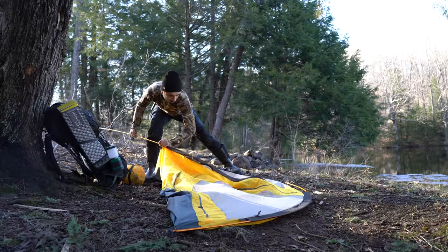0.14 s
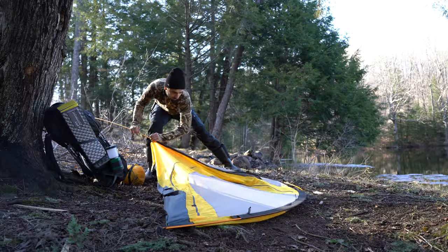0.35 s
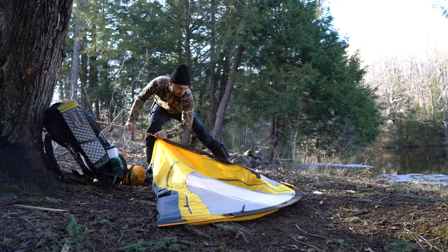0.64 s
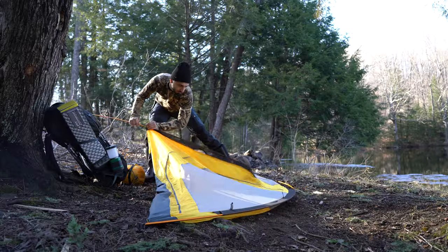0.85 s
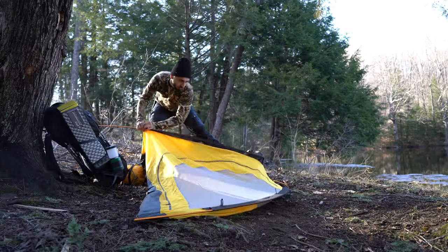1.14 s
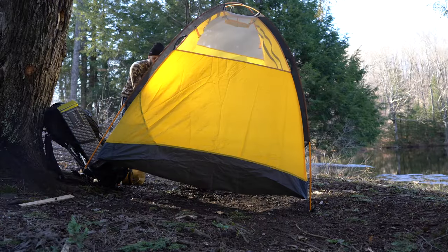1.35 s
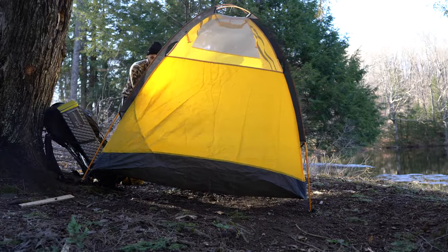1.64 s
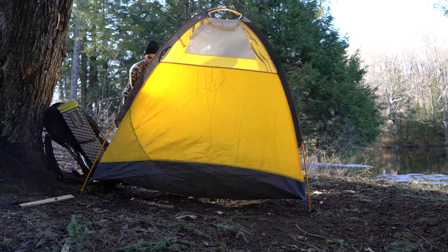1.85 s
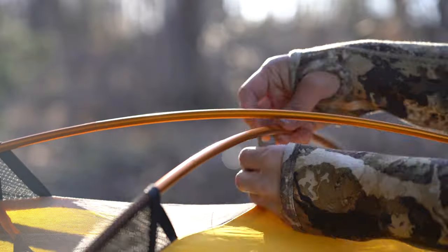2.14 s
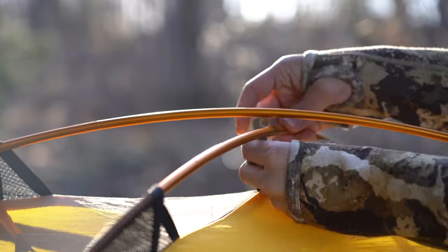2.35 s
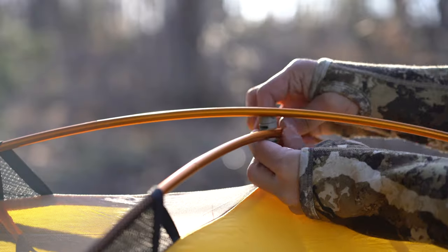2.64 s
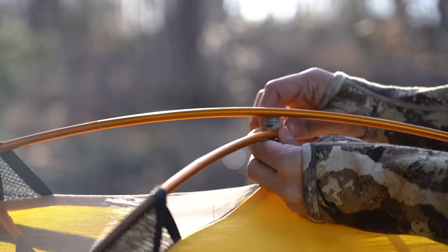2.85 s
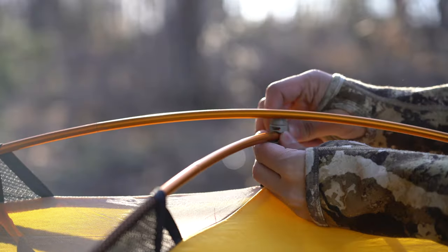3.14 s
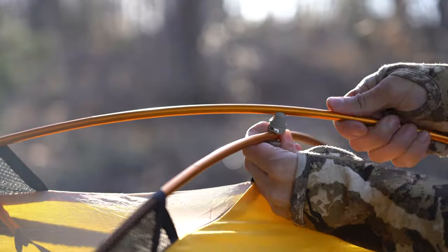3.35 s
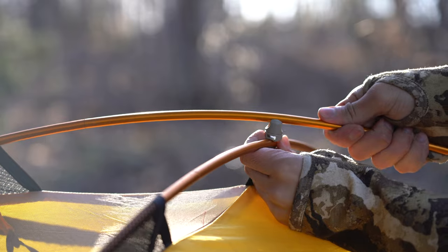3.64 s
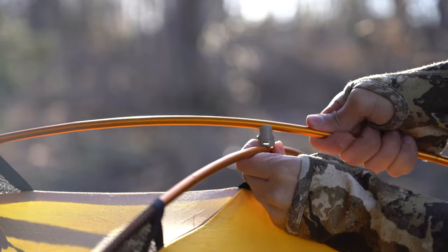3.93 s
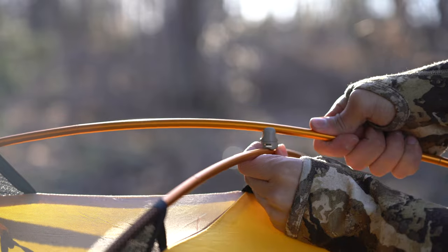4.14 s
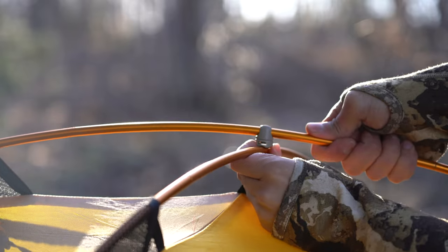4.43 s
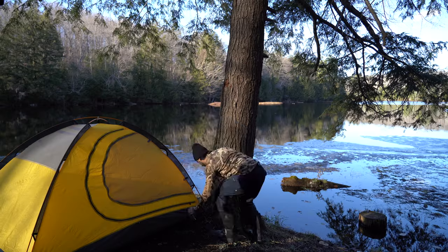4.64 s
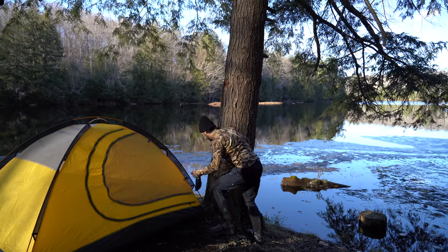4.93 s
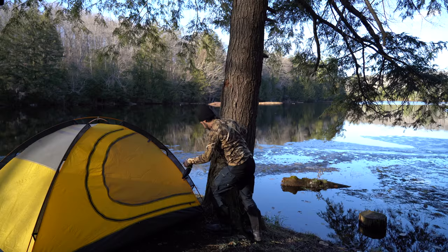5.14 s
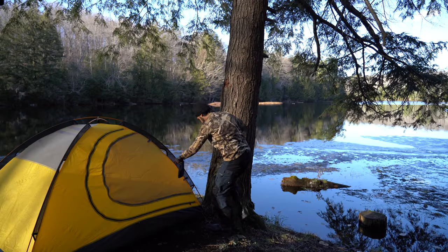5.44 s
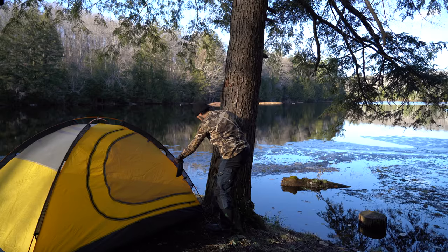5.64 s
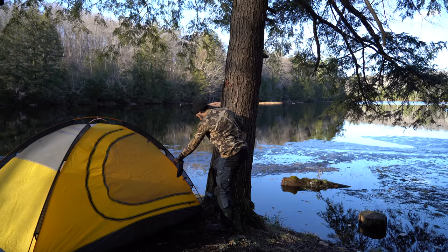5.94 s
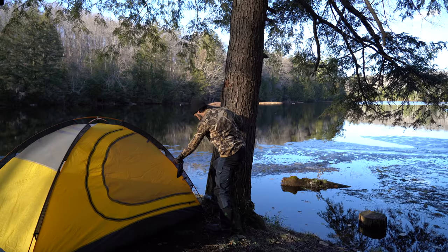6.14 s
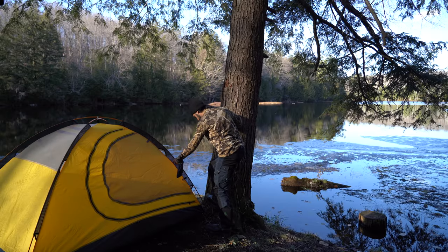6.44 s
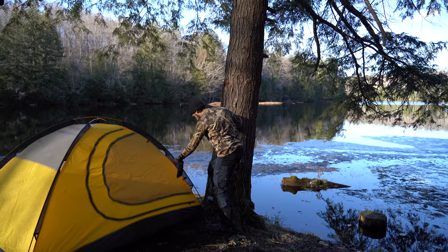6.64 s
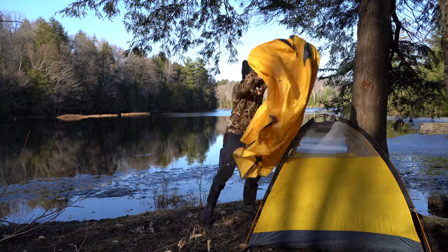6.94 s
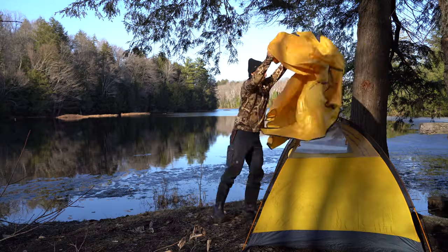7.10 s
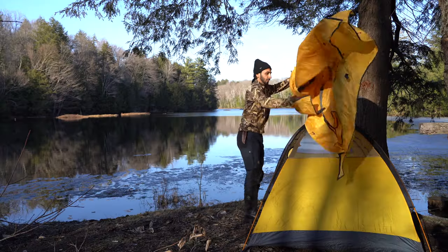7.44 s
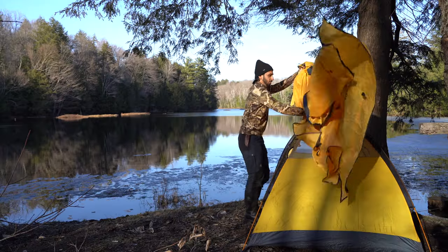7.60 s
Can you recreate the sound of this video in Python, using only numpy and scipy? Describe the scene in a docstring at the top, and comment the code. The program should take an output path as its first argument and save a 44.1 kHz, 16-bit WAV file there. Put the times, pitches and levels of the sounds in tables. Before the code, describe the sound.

In quiet open woods, nylon rustles softly while a tent is handled, and pole joints click sharply at wide intervals. A faint metal zip tab jingles briefly. The hardest snap comes past the middle, followed by a cluster of bright clacks and low wind bumps on the microphone. Finally a loose fabric sheet swishes loudly with a few dull ticks. Close, dry, centred sound with hard cuts.

```python
"""Quiet woods by a lake: a tent is pitched, heard in four passages joined by hard cuts.
Pole joints clack and clips tick: blows ring damped pole modes, nylon thumps, trees scatter it back.
A zip tab jingles as a few pure modes; nylon swishes as coloured noise with clumped crackles.
Light wind is low noise on a single microphone, over the steady air of the woods."""
import sys
import numpy as np
from scipy import signal
from scipy.fft import rfft, irfft, next_fast_len
from scipy.io import wavfile
from scipy.ndimage import uniform_filter1d

SR = 44100
rng = np.random.default_rng(int(sys.argv[2]) if len(sys.argv) > 2 else 0)


def to_wav(s):
    """Save 16-bit WAV."""
    ch = np.atleast_2d(s).T  # columns
    pcm = np.round(np.clip(ch, -1, 1) * 32767)  # PCM
    wavfile.write(sys.argv[1], SR, pcm.astype(np.int16))


N = 342596

# pole joints clacking home, one row for each contact, bounces included:
# start_s [s], peak_db [dB], centre_hz [Hz], spread_oct [octaves],
# rattle_db [dB], rattle_t60_s [s], thud_db [dB]
POLE_CLACKS = [(1.2154, -19.5, 8300, 0.13, -31.5, 0.041, -65), (1.2169, -38, 3020, 0.8, -36, 0.042, -49),
               (1.2212, -16.5, 8000, 0.83, -43, 0.18, -54), (1.548, -38, 8100, 0.11, -40.5, 0.08, -70),
               (1.5519, -23.5, 2700, 0.14, -40, 0.032, -40.5), (1.5543, -31, 8000, 1, -51, 0.14, -54),
               (1.5595, -28, 3370, 0.54, -52, 0.094, -45.5), (1.6988, -33.5, 3000, 1.15, -47.5, 0.051, -55),
               (2.45, -37, 3760, .82, -52.5, .06, -63), (2.6193, -44, 3000, 1.5, -56, .08, -64),
               (2.94, -56, 2000, 1., -64, .04, -51.5), (2.9807, -22, 6000, 1.2, -40, .02, -50),
               (2.9816, -8.5, 7200, .7, -24, .055, -40.5) , (3.0059, -45, 6000, .5, -46, .035, -53),
               (3.0142, -30, 6000, 1.2, -39, .06, -50.5), (3.3227, -36.5, 3900, 0.56, -54, 0.038, -53.5),
               (4.3641, -16, 7000, 1.4, -42, 0.015, -51.5), (4.365, -1, 10700, 0.89, -18.5, 0.029, -42),
               (4.3689, -11, 4970, 0.97, -28.5, 0.083, -29.5), (4.84, -20, 8000, 1.4, -33, .02, -77),
               (4.8415, -14, 6300, 1.4, -34, 0.025, -75), (4.8444, -16, 10000, 1.1, -42.5, 0.16, -75),
               (4.8745, -7.5, 9900, 0.5, -29, 0.027, -79), (4.8774, -15.5, 9200, 1.1, -45, .07, -75),
               (4.8837, -27, 11000, 0.77, -47, .08, -80), (4.89, -29, 8700, 0.83, -45.5, .2, -72),
               (6.6554, -28.5, 8500, 1.6, -33, 0.023, -60), (6.6592, -32.5, 6000, 1, -49, 0.23, -68)]


def pole_clacks(mix):
    """Pole joints knock home in bursts of close contacts, each a snap of its own."""
    for start_s, *blow in POLE_CLACKS:
        add(mix, start_s, snap(*blow))


# single light ticks of clips, pegs and creases against the poles:
# start_s [s], peak_db [dB], centre_hz [Hz], spread_oct [octaves]
LIGHT_TICKS = [(.32, -36, 1700, 1.2), (.3627, -39, 2500, 0.53), (0.491, -37, 1500, 1.2),
               (0.654, -49, 6000, 1.8), (0.748, -46, 1390, 0.51), (1.1102, -38, 2280, 0.48),
               (1.3882, -50, 4500, 0.85), (1.965, -50.5, 8300, .4), (1.991, -47, 2000, 1.1),
               (2.034, -45.5, 8000, .8), (2.071, -50, 14000, .3), (2.108, -49, 12000, .6),
               (2.133, -46.5, 5600, .4), (2.166, -54, 11500, .5), (2.52, -57, 1100, 0.67),
               (3.471, -55, 1100, 0.57), (3.681, -46.5, 2000, 0.72), (3.691, -46.5, 8000, 1.3),
               (4.4841, -38.5, 1790, 1), (4.653, -52, 7000, .8), (4.678, -46, 3000, 1.5),
               (4.695, -42, 4000, 1.2), (4.7495, -41, 2000, 1.2), (4.9913, -39.5, 4000, 1.2),
               (5.164, -35.5, 1100, 0.66), (5.3114, -43, 7000, 1.2), (5.602, -39.5, 1148, 0.47),
               (5.612, -48, 1500, 0.75), (5.627, -50, 1500, .6), (5.87, -49, 3500, 1.),
               (6.84, -20.5, 1500, 0.73), (7.143, -29.5, 1070, 0.22), (7.462, -35, 4000, 1.),
               (7.5222, -34.5, 3000, 0.46)]
TICK_RATTLE_DB, TICK_THUD_DB = -13.5, -20.5  # against the tick's peak
TICK_T60_S = 0.051


def light_ticks(mix):
    """Light contacts ring the same poles, with rattle and thud in fixed proportion to the tick."""
    for start_s, peak_db, centre_hz, spread_oct in LIGHT_TICKS:
        tick = snap(peak_db, centre_hz, spread_oct,
                    peak_db + TICK_RATTLE_DB, TICK_T60_S, peak_db + TICK_THUD_DB)
        add(mix, start_s, tick)


def snap(peak_db, centre_hz, spread_oct, rattle_db, rattle_t60_s, thud_db):
    """A sharp blow and a dying rattle ring the pole; nylon thumps; trees scatter the pole back."""
    t = np.arange(SR // 2) / SR
    pole = struck_pole(t, peak_db, centre_hz, spread_oct, rattle_db, rattle_t60_s)
    return pole + tent_thump(t, thud_db) + tree_scatter(t, pole)


# damped modes of a pole held in the hand; focused blows narrow the widths:
# pitch_hz [Hz], width_hz [Hz], level_db [dB]
POLE_MODES = [(1040, 710, 4.5), (1500, 420, 3.5), (2050, 460, 1), (2700, 530, -0.5), (3394, 380, -4),
              (3900, 380, -4), (4550, 700, 0), (5140, 550, 0), (5870, 740, -4), (7220, 1000, 1.5),
              (8300, 450, -3), (9540, 990, 1.5), (10800, 990, -1), (11620, 630, -4), (13000, 980, -3.5),
              (15300, 1200, -1.5)]


def struck_pole(t, peak_db, centre_hz, spread_oct, rattle_db, rattle_t60_s):
    """A blow excites the modes near its centre; decaying noise rattles a wider set of them."""
    short = t[:1024]
    pitch_hz, width_hz, level_db = np.transpose(POLE_MODES)[:, :, None]
    spread = max(spread_oct, .1)
    away = np.log2(pitch_hz / centre_hz) / spread
    # a focused blow touches lightly, so the few modes it reaches ring longer
    damping = np.pi * width_hz * np.clip(spread_oct + .5, .3, 1)
    modes = np.exp(-damping * short) * np.sin(2 * np.pi * pitch_hz * short)
    modes[::2] *= -1
    modes *= 1 - np.exp(-short * spread / .00015)  # a focused push also builds more slowly
    blow = (amp(level_db - np.minimum(6 * away ** 2, 24)) * modes).sum(0)
    # the rattle wanders and reaches more modes
    body = (amp(level_db - np.minimum(3 * away ** 2, 14)) * modes).sum(0)
    chatter = signal.oaconvolve(rng.standard_normal(len(t)), body)[:len(t)]
    fade = amp(rattle_db - 60 * t / rattle_t60_s)
    pole = fade * evened(chatter) * np.minimum(t / .0012, 1)
    pole[:1024] += amp(peak_db) * blow / abs(blow).max()
    return pole


# modes of the taut tent body, before small random shifts of pitch and level:
# pitch_hz [Hz], level_db [dB], t60_s [s]
TENT_MODES = [(128, -3.5, 0.053), (193, -6, .07), (230, -5.5, .06), (288.5, -2.5, 0.087), (385, -6, .05),
              (507, -5, 0.08), (634, -5.5, 0.052), (798, -3.5, 0.052), (1050, -3.5, .035), (1328, -3, .035)]


def tent_thump(t, thud_db):
    """A snap thumps the taut nylon, whose low modes die at once."""
    thump = np.zeros(len(t))
    for pitch_hz, level_db, t60_s in TENT_MODES:
        fade = amp(level_db + 1.8 * rng.standard_normal() - 60 * t / t60_s)
        cycles = pitch_hz * rng.uniform(0.93, 1.05) * t + rng.random()
        thump += fade * np.sin(2 * np.pi * cycles)
    return amp(thud_db) * thump * np.minimum(t / 0.0019, 1)


TREES_DB, TREES_HZ, TREES_T60_S = -25.5, 6000, .32  # duller above TREES_HZ


def tree_scatter(t, pole):
    """Trunks scatter the snap back as a soft-starting tail of dying, dulled noise."""
    echo = signal.lfilter(*signal.butter(1, TREES_HZ, fs=SR), rng.standard_normal(len(t)))
    echo = echo * amp(-60 * t / TREES_T60_S) * np.clip(t / 0.022, 0, 1)
    return amp(TREES_DB) * signal.fftconvolve(pole, echo / np.linalg.norm(echo))[:len(t)]


# knocks of the zip tab: start_s [s], free_s until it is stilled [s],
# then one column for each tab mode: mode_1_db, mode_2_db, mode_3_db [dB]
TAB_KNOCKS = [(2.068, .015, -62, -59, -69), (2.075, 0.032, -55, -53, -71), (2.096, 0.0096, -76, -57, -75),
              (2.104, 0.041, -54.5, -62, -72), (2.114, 0.015, -70, -70, -68), (2.134, .014, -68, -75, -65),
              (2.15, .025, -69, -79, -74), (3.035, .025, -57, -75, -74), (3.043, 0.014, -70, -56, -78)]


def tab_jingles(mix):
    """The metal zip tab is knocked lightly, mostly in one quick run."""
    for start_s, *knock in TAB_KNOCKS:
        add(mix, start_s, jingle(*knock))


# modes of the metal zip tab: pitch_hz [Hz], t60_s [s]
TAB_MODES = [(6580, 0.35), (8720, 0.11), (10800, 0.15)]


def jingle(free_s, *levels_db):
    """A light knock rings the tab, unevenly, until it touches cloth again."""
    t = np.arange(SR // 10) / SR
    stilled = amp(-1500 * np.maximum(t - free_s, 0)) * np.minimum(t / 0.00093, 1)
    shakes = evened(uniform_filter1d(rng.standard_normal((len(TAB_MODES), len(t))), 200, 1))
    ring = np.zeros(len(t))
    for (pitch_hz, t60_s), level_db, shake in zip(TAB_MODES, levels_db, shakes):
        fade = amp(level_db + 2.3 * shake - 60 * t / t60_s)
        # the shake sways level and phase together
        ring += fade * np.sin(2 * np.pi * (pitch_hz * t + rng.random()) + 0.87 * shake)
    return stilled * ring


# relative colour of a pole sleeve or cuff sliding: pitch_hz [Hz], level_db [dB per Hz]
SLEEVE_COLOUR = [(59, -36.5), (100, -5.5), (166, -7.5), (288, -1.5), (379, -2.5), (829, -3), (1560, -2.5),
                 (2400, -4), (5570, -15.5), (7980, -12), (10100, -22.5), (12400, -17), (15700, -26)]
# relative colour of the loose fly sheet flung over the tent: pitch_hz [Hz], level_db [dB per Hz]
FLY_COLOUR = [(59, -39), (100, -12.5), (327, -4), (371, -4), (449, 0.5), (686, -2.5), (847, -0.5),
              (1890, -4), (4800, -11), (5690, -17), (7810, -10.5), (9450, -19), (15700, -21)]
CRACKLES_PER_S, CRACKLE_DB, CRACKLE_HZ = 700, -11.5, 3490  # mean rate, level mixed in, low-pass


def nylon():
    """Sliding hiss and clumped crease crackles share the cloth's colour and follow its motion."""
    level, bright_db = motion()
    clumps = amp(2.0 * evened(uniform_filter1d(rng.standard_normal(N), 500)))
    size = amp(3.1 * np.minimum(rng.exponential(1, N), 4)) * rng.choice([-1., 1.], N)
    crackle = size * (rng.random(N) < clumps * CRACKLES_PER_S / SR)
    crackle = signal.lfilter(*signal.butter(2, CRACKLE_HZ, fs=SR), crackle)  # soft creases pop dully
    hiss = rng.standard_normal(N) * np.sqrt(clumps)
    rubbing = hiss + amp(CRACKLE_DB) * evened(crackle)
    # the fly sheet fills the last passage
    before_fly = np.arange(N) < CUTS_S[-1] * SR
    cloth = np.where(before_fly, tinted(rubbing, SLEEVE_COLOUR), tinted(rubbing, FLY_COLOUR))
    # patchy grain over time and pitch, and a brightness tilt that follows the motion
    hz, t, z = signal.stft(cloth, SR, nperseg=256)
    grain = uniform_filter1d(rng.standard_normal(z.shape[::-1]), 10, 0)
    patches = evened(uniform_filter1d(grain, 5, 1)).T
    octaves = np.log2((hz[:, None] + 100) / 1500)
    z = z * amp(1.6 * patches + octaves * np.interp(t, np.arange(N) / SR, bright_db))
    return level * signal.istft(z, SR, nperseg=256)[1][:N]


# swishes of nylon, levels before the brightness tilt: peak_s [s], level_db [dB],
# rise_s to swell 10 dB [s], fall_s to fade 10 dB [s], bright_db [dB per octave]
NYLON_SWISHES = [(0.115, -58.0, 0.196, 0.054, 0.0), (0.371, -49.0, 0.092, 0.102, 0.0),
                 (0.487, -47.5, 0.088, 0.097, 0.5), (0.645, -59.0, 0.04, 0.084, 0.5),
                 (0.89, -48.5, 0.093, 0.157, 0.0), (0.951, -49.0, 0.092, 0.084, 2.0),
                 (1.216, -54.0, 0.214, 0.1, 0.5), (1.747, -62.5, 0.052, 0.031, -0.5),
                 (1.889, -65.0, 0.176, 0.032, -1.0), (2.09, -58.0, 0.14, 0.14, -2.5),
                 (2.524, -72.5, 0.121, 0.108, 0.0), (2.731, -69.0, 0.082, 0.02, 0.0),
                 (3.248, -66.0, 0.245, 0.02, 0.5), (3.299, -65.5, 0.031, 0.022, 4.0),
                 (3.414, -65.5, 0.027, 0.154, 0.0), (3.689, -64.5, 0.175, 0.159, 1.0),
                 (3.857, -64.0, 0.026, 0.073, 1.0), (3.967, -59.0, 0.086, 0.064, 0.5),
                 (4.09, -66.5, 0.095, 0.193, 0.0), (4.282, -59.5, 0.065, 0.024, 0.0),
                 (4.44, -56.0, 0.108, 0.104, 0.0), (4.614, -59.5, 0.098, 0.037, 0.0),
                 (4.693, -54.5, 0.029, 0.072, 0.5), (4.75, -58.0, 0.024, 0.124, -1.5),
                 (4.956, -57.0, 0.209, 0.114, 2.0), (5.117, -54.0, 0.026, 0.042, 0.0),
                 (5.333, -62.5, 0.264, 0.105, 1.5), (5.665, -62.5, 0.144, 0.077, 0.0),
                 (5.884, -69.0, 0.226, 0.058, 1.0), (6.586, -70.5, 0.02, 0.02, -5.5),
                 (6.765, -35.0, 0.05, 0.126, -0.5), (6.839, -36.5, 0.024, 0.05, -2.5),
                 (6.99, -43.0, 0.223, 0.296, 0.5), (7.377, -49.0, 0.141, 0.035, 1.5),
                 (7.477, -46.5, 0.065, 0.281, 0.5), (7.731, -45.5, 0.195, 0.148, 1.0)]
# faint rustle between the swishes, one row for each passage: level_db [dB], bright_db [dB per octave]
RUSTLES = [(-69, 1.4), (-72, -6), (-80.5, -1.5), (-52.5, 0.7)]


def motion():
    """Level and brightness of the cloth: swishes over faint rustle, each kept to its own passage."""
    *shape, bright_db = np.transpose(NYLON_SWISHES)
    bells = swells(*shape)
    passage = np.searchsorted(CUTS_S, np.arange(N) / SR)
    home = np.searchsorted(CUTS_S, shape[0])
    powers, tilts = [], []
    for k, (rustle_db, rustle_bright_db) in enumerate(RUSTLES):
        own = home == k
        rustle = amp(2 * rustle_db)  # as power
        powers.append(joined(bells[own]) + rustle)
        tilts.append(joined(bells[own], bright_db[own, None]) + rustle * rustle_bright_db)
    power = np.choose(passage, powers)
    return np.sqrt(power), np.choose(passage, tilts) / power  # the louder cloth sets the brightness


# gusts, level gliding between points: time_s [s], level_db [dB], flutter_db [dB against level_db]
WIND_GUSTS = [(0, -49, -10.5), (.13, -68, 5), (.33, -54, -20), (.6, -53.5, -13), (1.2, -61, -13),
              (1.27, -73, 2), (2.1, -81, 4), (2.75, -69.5, -12), (2.9, -65, -9.5), (3.05, -71, -2),
              (3.3, -58.5, -15), (3.5, -64.5, -12), (4, -57.5, -12.5), (4.4, -53.5, -5), (4.65, -57.5, -8),
              (5.0, -50.5, -22), (5.5, -57, -22), (5.62, -76.5, -4.5), (6.1, -66.5, -14), (6.6, -71.5, -5),
              (7.1, -77, -2), (7.77, -73, 1)]
# single buffets: peak_s [s], lump_db [dB], flutter_db [dB]
WIND_BUFFETS = [(.26, -51, -62), (.69, -62, -55.5), (.885, -51, -47), (1.045, -47, -53), (2.25, -63, -85),
                (3.39, -60, -70), (4.5, -56, -49), (4.86, -44.5, -60), (5.09, -38, -55),
                (5.89, -55.5, -85.5), (6.35, -56.5, -80)]
# relative colour of the slow pressure lumps: pitch_hz [Hz], level_db [dB per Hz]
LUMP_COLOUR = [(7.6, -28.5), (13, 7), (25, -1.5), (35, -12.5), (50, -18.5), (65, -50), (110, -120)]
# relative colour of the higher flutter: pitch_hz [Hz], level_db [dB per Hz]
FLUTTER_COLOUR = [(25, -39.5), (45, 5), (80, -8), (130, -17.5), (200, -54)]
BUFFET_S = .03  # to swell or fade 10 dB


def wind():
    """Slow pressure lumps thump the microphone; gusts and buffets also flutter higher up."""
    time_s, *columns = np.transpose(WIND_GUSTS)
    level_db, flutter_db = (np.interp(np.arange(N) / SR, time_s, c) for c in columns)
    peak_s, *buffet_db = np.transpose(WIND_BUFFETS)
    push, shake = (np.sqrt(joined(swells(peak_s, db, BUFFET_S, BUFFET_S))) for db in buffet_db)
    lumps, flutter = rng.standard_normal((2, N))
    lumps = np.hypot(amp(level_db), push) * tinted(lumps, LUMP_COLOUR)
    flutter = np.hypot(amp(level_db + flutter_db), shake) * tinted(flutter, FLUTTER_COLOUR)
    return lumps + flutter


# relative colour of the air: pitch_hz [Hz], level_db [dB per Hz]
WOODS_COLOUR = [(41, -35), (70, -5), (222, -2), (410, -0.5), (926, -7), (1080, -10), (1360, -9.5),
                (2560, -15.5), (13400, -21), (15700, -20)]
WOODS_DB = -68


def woods():
    """Steady coloured noise: air of the woods and the microphone's own hiss."""
    return amp(WOODS_DB) * tinted(rng.standard_normal(N), WOODS_COLOUR)


# relative colour of the hiss between channels: pitch_hz [Hz], level_db [dB per Hz]
APART_COLOUR = [(18, -37.5), (30, 2), (257, 4), (1610, -17.5), (2320, -19), (3920, -19), (15700, -7)]
APART_DB = -83.5


def channel_hiss():
    """A faint coloured hiss, the only thing that sets the channels apart."""
    return amp(APART_DB) * tinted(rng.standard_normal(N), APART_COLOUR)


def amp(db):
    """Decibels to amplitude."""
    return 10 ** (np.asarray(db) / 20)


def evened(x):
    """Scales x to rms 1."""
    return x / np.sqrt(np.mean(x ** 2) + 1e-20)


def read(points, hz):
    """Reads a colour table along a log pitch axis."""
    f, value = np.transpose(points)
    return np.interp(np.log(hz + 1), np.log(f + 1), value)


def tinted(x, points):
    """Filters x by a colour table, rms 1."""
    size = next_fast_len(len(x))
    gain = amp(read(points, np.fft.rfftfreq(size, 1 / SR)))
    return evened(irfft(rfft(x, size) * gain, size)[:len(x)])


def swells(peak_s, level_db, rise_s, fall_s):
    """Swells of level, round on top and straight in dB at the flanks, a row each, every 64 samples."""
    dt = np.arange(0, N + 64, 64) / SR - np.asarray(peak_s)[:, None]
    span = np.where(dt < 0, np.reshape(rise_s, (-1, 1)), np.reshape(fall_s, (-1, 1)))
    drop_db = 10 * (np.sqrt(1 + 3 * (dt / np.maximum(span, .01)) ** 2) - 1)
    return amp(np.asarray(level_db)[:, None] - drop_db)


def joined(rows, weights=1):
    """Adds the swells' weighted powers at the sample rate."""
    return np.interp(np.arange(N), np.arange(rows.shape[1]) * 64, (weights * rows ** 2).sum(0))


# hard cuts from one passage to the next: time_s [s]
CUTS_S = [1.2585, 2.176, 6.7625]


def add(mix, start_s, sound):
    """Mixes a sound in at its start; the next cut silences what is left of it."""
    end = min([round(c * SR) for c in CUTS_S if c > start_s] + [N])
    part = mix[round(start_s * SR):end][:len(sound)]
    part += sound[:len(part)]


def scene():
    """All sources in the centre, with the faint hiss opposed between left and right."""
    mid = nylon() + woods() + wind()
    pole_clacks(mid)
    light_ticks(mid)
    tab_jingles(mid)
    side = channel_hiss()
    return np.array([mid + side, mid - side])


EDGE_HZ = 15900


def record(dry):
    """A steep low-pass limits the band at EDGE_HZ."""
    low_pass = signal.firwin(511, EDGE_HZ, window=("kaiser", 9), fs=SR)
    return signal.oaconvolve(dry, low_pass[None], "same")


dry = scene()
out = record(dry)
to_wav(out)
```